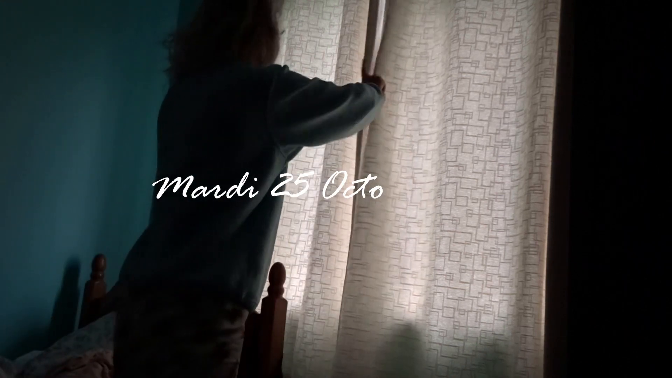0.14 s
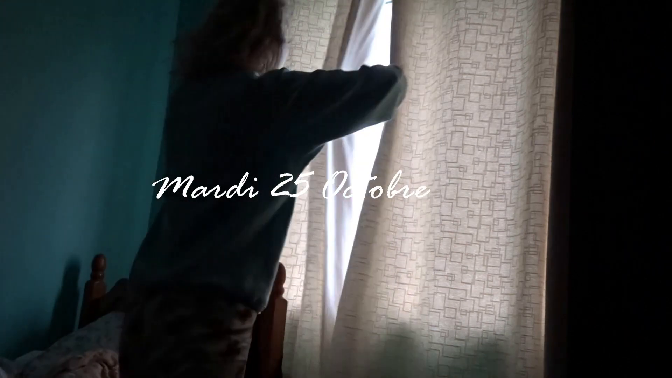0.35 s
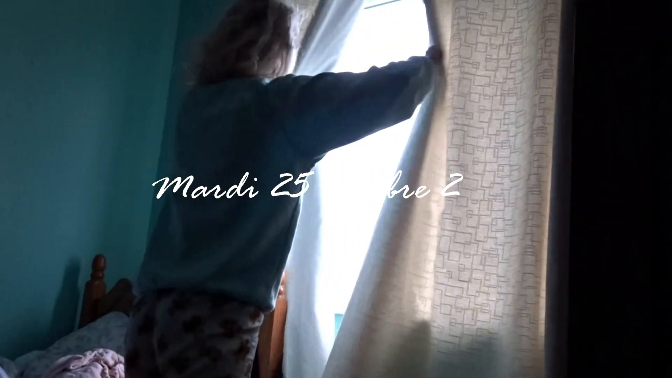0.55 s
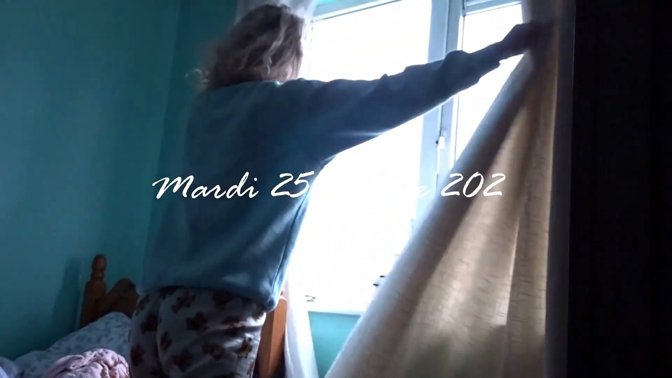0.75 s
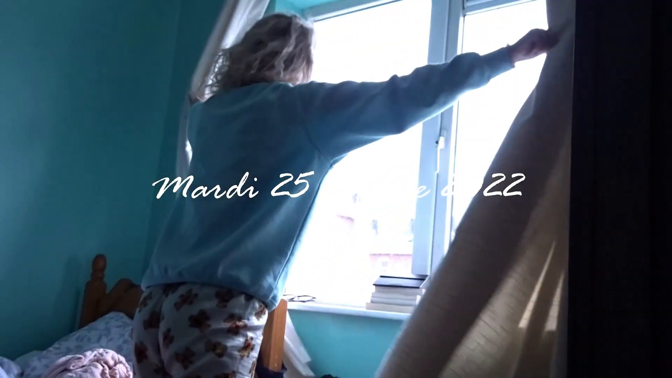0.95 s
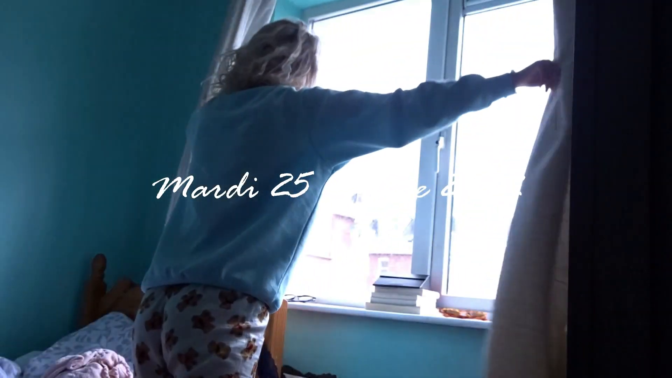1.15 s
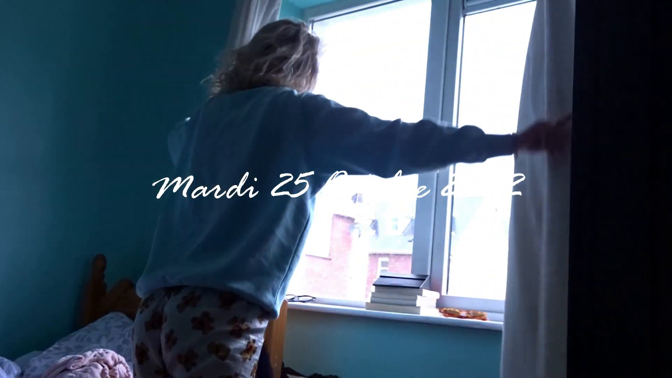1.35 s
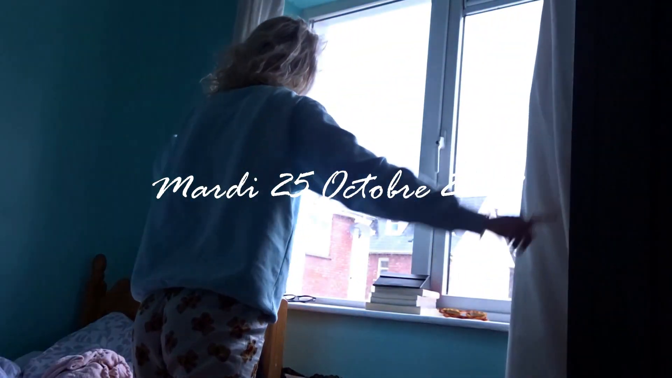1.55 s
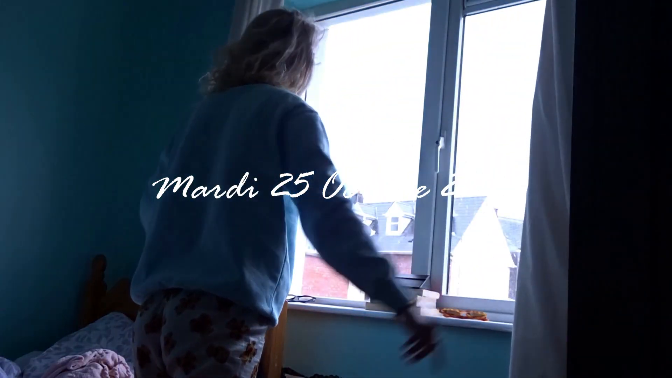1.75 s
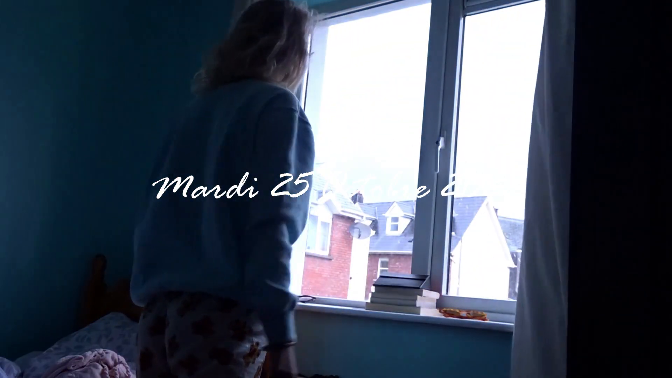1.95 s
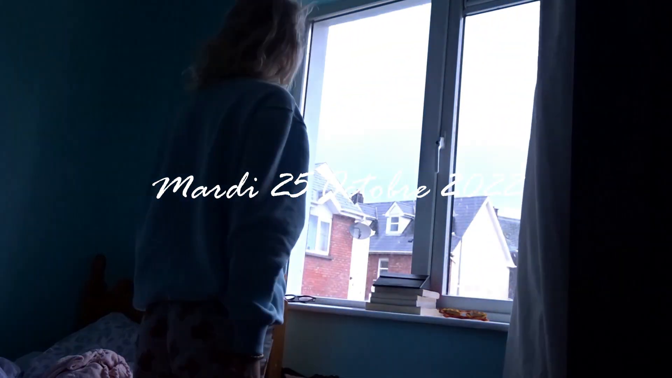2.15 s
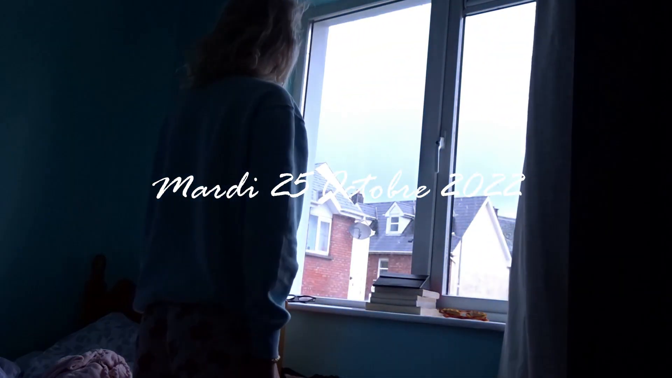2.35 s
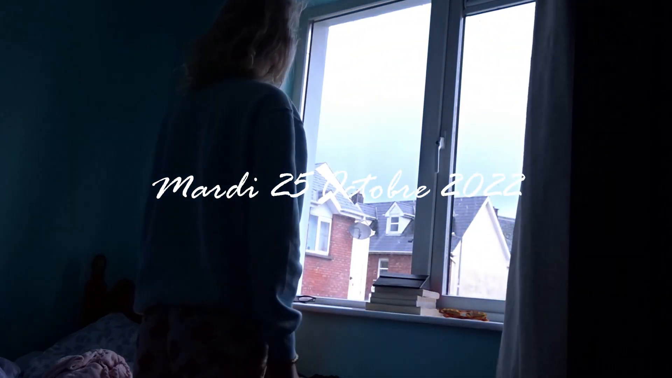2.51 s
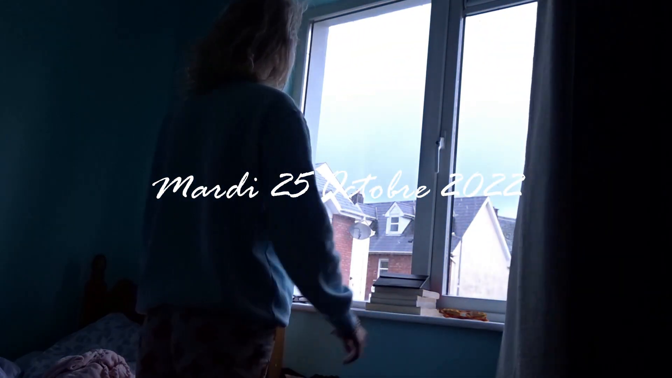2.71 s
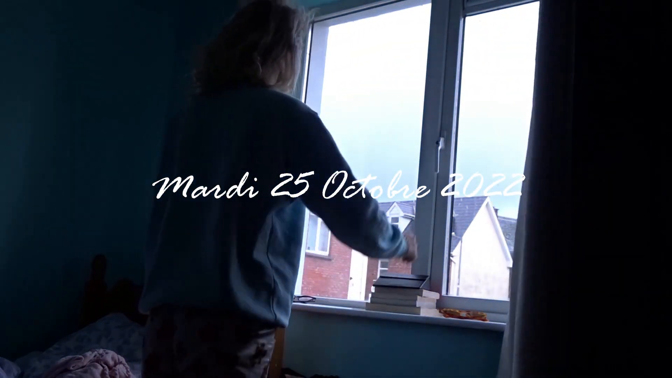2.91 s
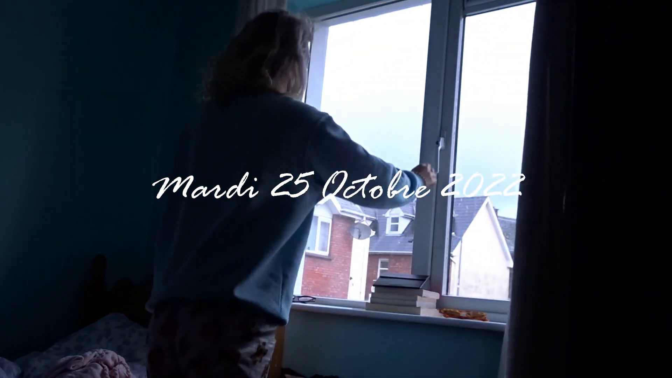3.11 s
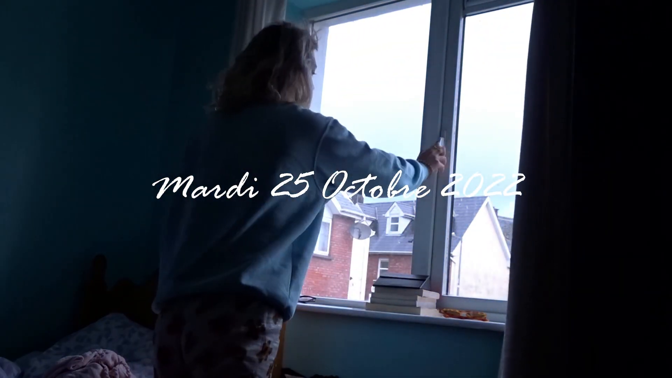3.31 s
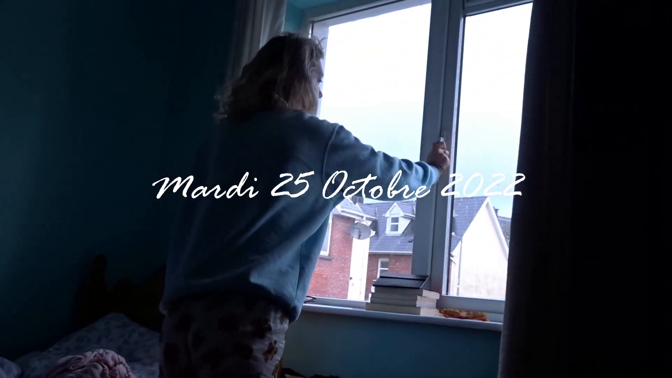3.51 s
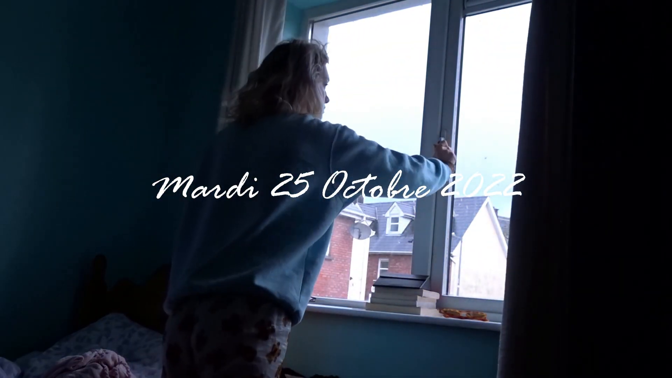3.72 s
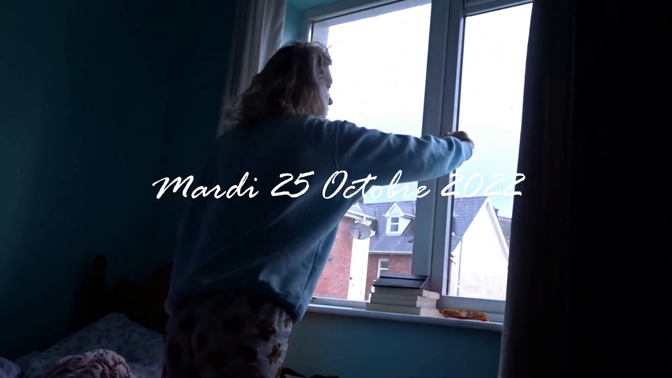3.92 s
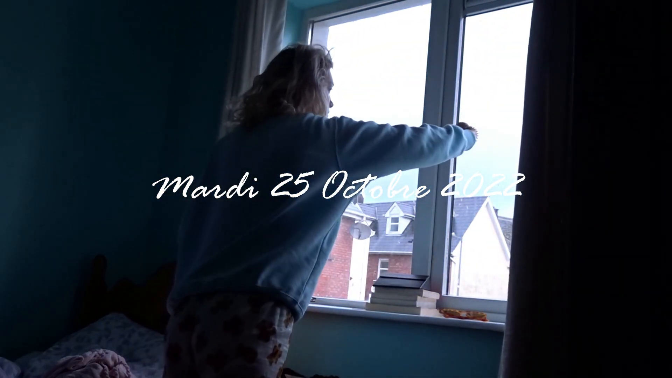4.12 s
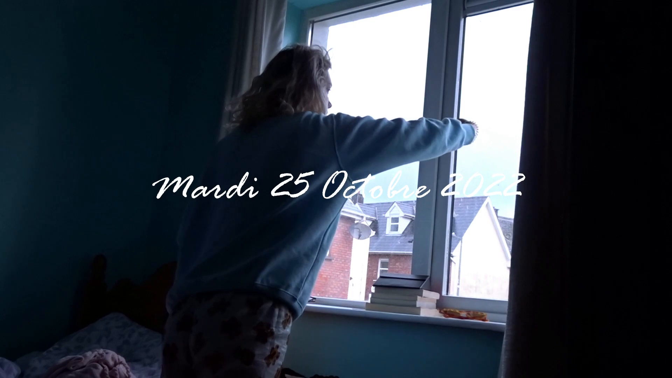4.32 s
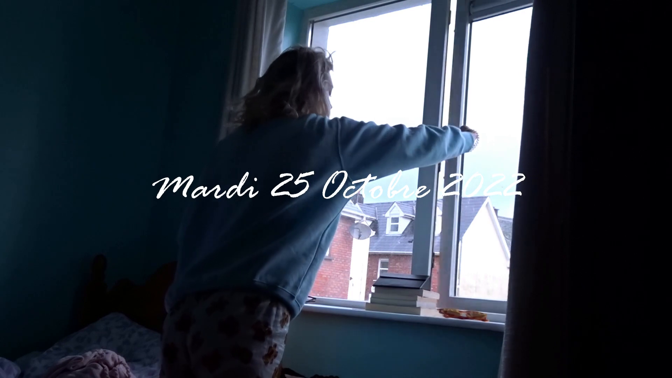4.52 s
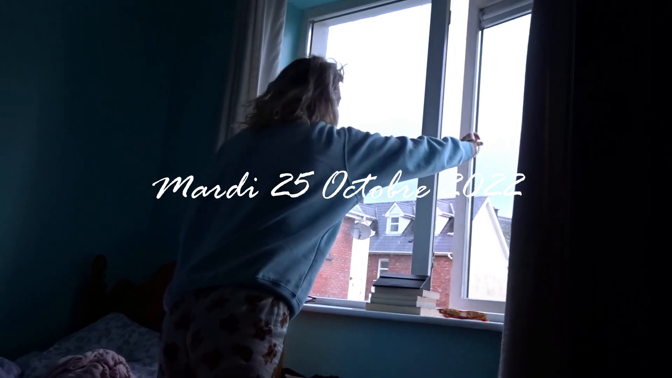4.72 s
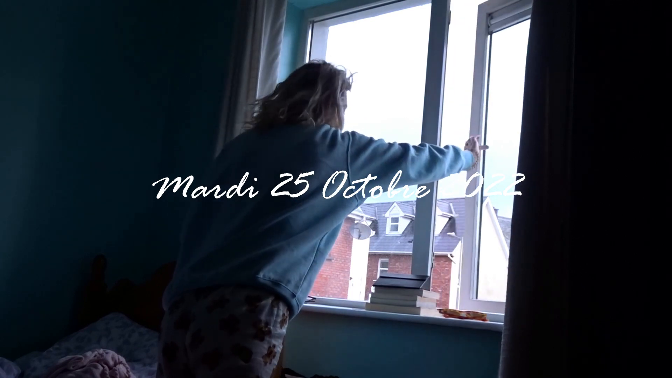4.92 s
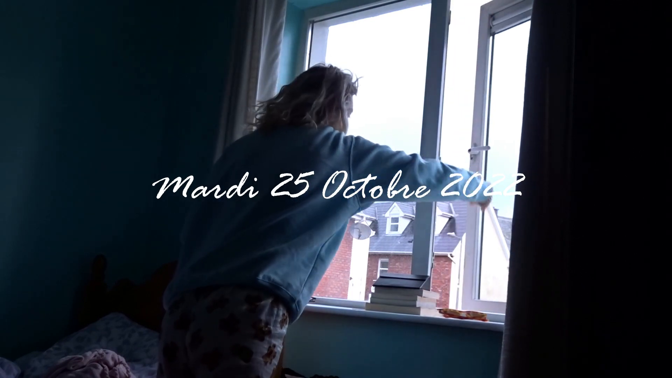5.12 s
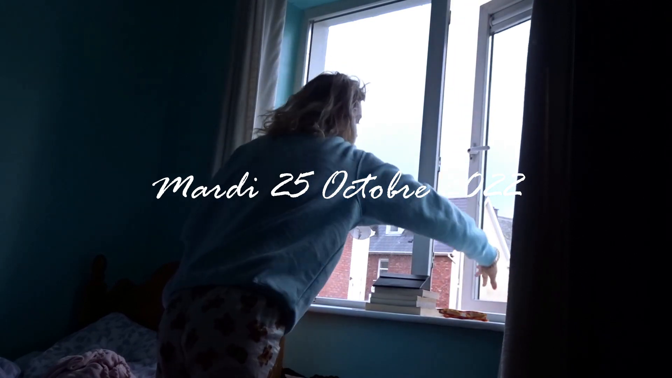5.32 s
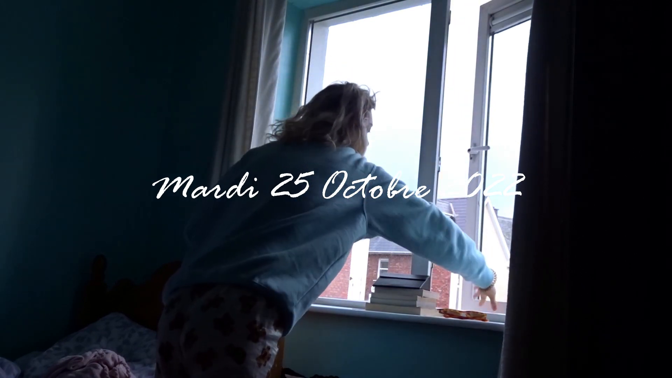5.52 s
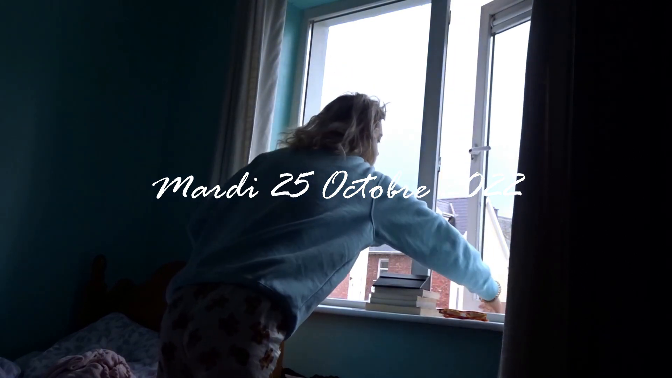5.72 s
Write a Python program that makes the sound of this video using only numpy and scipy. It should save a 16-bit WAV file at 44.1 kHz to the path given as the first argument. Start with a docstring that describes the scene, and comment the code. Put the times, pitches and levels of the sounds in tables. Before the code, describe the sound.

A small, quiet bedroom is heard through a nearby stereo microphone, with faint steady hiss and short echoes. It opens with a soft stir of floor and clothing. At about 0.4 seconds curtains are pulled open: gliders rattle and scrape brightly along a thinly ringing rail, loudest around 0.8 seconds, bunch up at 1 second and settle with small ticks by 1.6. A lull follows, with only faint rustling, shifting weight and a few tiny ticks. From 3.5 to 4 seconds a window handle turns with sharp plastic clicks, metal scraping and a thud through the frame and pane. Between 4.2 and 4.8 seconds the window peels off its rubber seal and swings out with another cluster of knocks and rubbing. A barely audible high hinge squeak comes near 4.9 seconds. Soft sleeve rustle and a faint low hum close the scene around 5.8 seconds.

```python
"""A faint stir of floor and cloth, then curtains are pulled open: gliders rattle along a rail, bunch up
and settle. After a lull a window handle is turned, the sash peels off its rubber seal and swings out,
shaking frame and pane. Each source is a stream of tiny contacts, coloured by the thing they shake.
A stereo microphone stands in the small bedroom, near enough for the direct sound to lead the echoes."""
import sys
import numpy as np
from scipy import signal
from scipy.fft import rfft, irfft, next_fast_len
from scipy.io import wavfile

SR = 44100
rng = np.random.default_rng(int(sys.argv[2]) if len(sys.argv) > 2 else 0)


def transcribe(u):
    """Save the signal u as a 16-bit wav file named by the first command-line argument.

    u: samples, shape (n,) or (channels, n), limited to [-1, 1]; the rate is SR.
    q: integer samples, one column per channel.
    """
    v = np.clip(np.atleast_2d(u).T, -1, 1)
    q = np.round(v * 32767).astype(np.int16)
    wavfile.write(sys.argv[1], SR, q)


N = 258110
TIME = np.arange(N) / SR
PAD = next_fast_len(N + SR // 2)
HZ = np.maximum(np.arange(PAD // 2 + 1) * SR / PAD, 1)


def amp(db):
    """Decibels to gain; table levels are relative, ahead of each layer's own gain."""
    return 10 ** (np.asarray(db) / 20)

def rms_one(x):
    """Scale to unit power."""
    return x / np.sqrt(np.mean(x ** 2) + 1e-20)

def gains(table):
    """Level curves as gains, silent outside their span."""
    times, *columns = np.transpose(table)
    return np.array([amp(np.interp(TIME, times, db, -200, -200)) for db in columns])

def bursts(events, count):
    """Each event cracks, then dies away with a t60 of at most 0.4 s; one gain per level column."""
    out, t = np.zeros((count, N)), np.arange(SR // 2) / SR
    for start, *levels_db, t60 in events:
        at = round(start * SR)
        fall = amp(-60 * t / np.clip(t60, .01, .4)) + 0.25 * np.exp(-t / 0.00084)
        out[:, at:at + len(t)] += amp(levels_db)[:, None] * fall[:N - at]
    return out

def swells(rows, pace=(1,)):
    """Movements rise and fall at steady dB rates times pace; one gain per level column."""
    power = 0
    for peak, *levels_db, rise, fall in rows:
        since = TIME - peak
        slope_db = np.minimum(abs(rise) * since, -abs(fall) * since)
        power += amp(np.c_[levels_db] + np.c_[list(pace)] * slope_db) ** 2
    return np.sqrt(power)

def drift(per_s, count):
    """Slow random wander, one curve per row."""
    knots = rng.standard_normal((count, 200))
    return np.array([np.interp(TIME * per_s, np.arange(len(k)), k) for k in knots])

def shape(points):
    """A spectrum table as gain on the frequency grid."""
    hz, db = np.transpose(points)
    return amp(np.interp(np.log(HZ), np.log(hz), db))

def body(modes):
    """Resonances side by side, signs alternating."""
    return sum((-1) ** k * amp(db) * 1j * HZ * width / (hz ** 2 - HZ ** 2 + 1j * HZ * width)
               for k, (hz, width, db) in enumerate(modes))

def through(excitation, gain, response):
    """The spectrum of an excited body, its response scaled to unit power."""
    return rfft(excitation * gain, PAD) * response / np.sqrt(np.mean(np.abs(response) ** 2))

def resonate(x, hz, width):
    """One mode with steep skirts: two wider resonances in a row."""
    r = np.exp(-np.pi * 1.55 * width / SR)
    mode = [1, 0, -1, 1, -2 * r * np.cos(2 * np.pi * hz / SR), r * r]
    return (1 - r * r) ** 1.5 / 2 * signal.sosfilt([mode, mode], x + 1e-18)

def grains(per_s, spread_db, smooth):
    """Uneven little contacts over even friction, as mid and side streams."""
    sizes = amp(spread_db * np.minimum(rng.exponential(1, (2, N)), 4)) * rng.choice([-1, 1], (2, N))
    clicks = rms_one(sizes * (rng.random((2, N)) < per_s / SR))
    return rms_one(clicks + smooth * rng.standard_normal((2, N)))

def elsewhere(contacts):
    """The same kind of contacts at another spot: unrelated in detail."""
    return np.roll(contacts, rng.integers(N), axis=1)

def strike(contacts, times, db):
    """Add one sharp impact at each time."""
    struck = contacts.copy()
    struck[:, np.round(times * SR).astype(int)] += amp(db)
    return struck

def knocks(contacts, modes, blows, db_per_octave):
    """Each blow strikes once, then chatters; it wakes mostly the modes near its own pitch."""
    starts, db, t60, pitch = np.transpose(blows)
    struck = strike(contacts, starts, db=17.5)
    out = 0
    for hz, width, _ in modes:
        mode_db = db - db_per_octave * np.abs(np.log2(pitch / hz))
        out += resonate(struck * bursts(np.c_[starts, mode_db, t60], count=1)[0], hz, width)
    return rfft(out, PAD)

def steered(contacts, gain, modes, lead_hz, db_per_octave):
    """Rubbing feeds every mode, most those near the leading pitch."""
    out = 0
    for hz, width, db in modes:
        mode_db = db - db_per_octave * np.abs(np.log2(lead_hz / hz))
        out += resonate(elsewhere(contacts) * gain * amp(mode_db), hz, width)
    return rfft(out, PAD)


# The still bedroom, mid and side. Each row: frequency in Hz, noise density in dB.
ROOM_MID = [(12, -47.5), (20, -18), (119, -18.5), (172, -13.5), (268, -13), (397, -13.5), (524, -8.5),
            (655, -21), (1180, -27), (1690, -15.5), (1890, -20), (2240, -20), (3130, -23.5), (9040, -29),
            (15800, -35.5)]
ROOM_SIDE = [(12, -59), (20, -37), (227, -10), (326, -11.5), (408, -7), (570, -5.5), (797, -9),
             (2500, -13.5), (3130, -15), (15800, -27.5)]

def room_tone():
    """Steady room air and microphone hiss, as mid and side spectra."""
    return (through(rng.standard_normal(N), amp(-60.5), shape(ROOM_MID)),
            through(rng.standard_normal(N), amp(-59), shape(ROOM_SIDE)))


# A low hum in the room. Each row: frequency in Hz, width in Hz, level in dB.
HUM_MODES = [(269, 40, 0), (327, 28, 2), (370.3, 30, -2)]
# Its course. Each row: time in seconds, level in dB.
HUM_CURVE = [(0.0, -42), (0.04, -45), (0.164, -59), (0.4, -61), (1.74, -63.5), (1.85, -69), (2.1, -80),
             (2.5, -78), (2.83, -61), (2.95, -76), (3.25, -56), (3.32, -66), (4.85, -60), (5.16, -58),
             (5.5, -54), (5.6, -61), (5.72, -47.5), (5.78, -55.5), (5.85, -58.5)]
# Its tone. Each row: peak time in seconds, level in dB, rise and fall in dB per second.
HUM_SWELLS = [(5.66, -59, 59.5, 36.5), (5.8, -51.5, 120, 31.5)]

def hum(rubbing):
    """A low hum comes and goes; near the end a narrow tone stands out of it."""
    pitch_hz = 255 + 4.73 * drift(per_s=12, count=1)[0]
    tone = np.sqrt(2) * np.sin(2 * np.pi * np.cumsum(pitch_hz) / SR) * swells(HUM_SWELLS)[0]
    return rfft(tone, PAD) + through(elsewhere(rubbing), gains(HUM_CURVE)[0], body(HUM_MODES))


# Someone shifts about, faint at the microphone.
# Each row: peak time in seconds, floor and cloth levels in dB, rise and fall in dB per second.
SHIFTS = [(0.0, -51.5, -51.5, 98, 63.5), (0.42, -79, -51.5, 205.5, 306), (1.99, -64.5, -68, 147, 43),
          (2.08, -68.5, -65.5, 40.5, 200), (2.83, -72, -63, 59, 45), (3.28, -54, -58.5, 76, 26),
          (4.85, -72.5, -57.5, 200, 23.5), (5.58, -70, -59.5, 75, 100), (5.74, -61.5, -60, 94.5, 31.5)]
# Boards underfoot. Each row: frequency in Hz, width in Hz, level in dB.
BOARD_MODES = [(124, 38.5, 8), (75.4, 50, -15), (199, 120, -3)]
# Sleeves. Each row: frequency in Hz, density in dB.
CLOTH_SPECTRUM = [(100, -46), (300, -4.5), (600, 7.5), (1000, 6.5), (2000, -7.5), (4000, -7.5),
                  (9000, -16.5), (15000, -19.5)]

def stir(rubbing):
    """Weight shifts on the boards and sleeves rustle, never quite still."""
    restless = amp(np.c_[[-80.5, -68]] + 4.5 * drift(per_s=3.6, count=2))
    weight, rustle = np.hypot(swells(SHIFTS), restless)
    return through(rubbing, weight, body(BOARD_MODES)) + through(rubbing, rustle, shape(CLOTH_SPECTRUM))


# At the window, strokes of handle and sash. Each row: peak time in seconds, levels of frame thud,
# plastic rub, metal scrape and pane in dB, base rise and fall in dB per second.
STROKES = [(3.566, -35, -29, -25, -37, 604, 198), (3.62, -37.5, -46, -42, -40, 251, 202),
           (3.678, -20.5, -30, -62, -27.5, 704, 252), (3.81, -38, -48, -47.5, -59.5, 500, 118),
           (3.85, -44, -34, -33.5, -43, 222, 260), (3.926, -47, -44.5, -44.5, -50, 404, 76),
           (4.05, -52, -71, -71, -59, 200, 146), (4.37, -30, -26.5, -31.5, -38, 226, 260),
           (4.385, -27.5, -30, -56, -37, 300.5, 300), (4.428, -37.5, -33.5, -42.5, -34.5, 400, 206),
           (4.56, -43.5, -38, -48, -48.5, 175, 98), (4.66, -43, -42, -69, -42.5, 252, 249.5),
           (4.675, -54, -57, -67, -39, 400, 350), (4.76, -56.5, -59, -61.5, -59.5, 42, 40)]
# Faint ticks of someone moving about, then knocks of handle and latch. Each row: start in seconds,
# levels of scrape, seal, thud and knock in dB, t60 in seconds, knock pitch in Hz.
TICKS_AND_KNOCKS = [(2.049, -50.5, -62, -70, -48.5, 0.1, 1650), (2.826, -64.5, -81, -53, -44, 0.1, 793),
                    (3.1635, -57, -66.5, -66, -43.5, 0.17, 773), (3.2185, -48.5, -61, -46, -60, 0.23, 556),
                    (3.268, -48, -67, -59, -53, 0.26, 758), (3.468, -46, -50.5, -41, -51, 0.2, 810),
                    (3.5226, -23, -48, -27.5, -33, 0.11, 745), (3.5538, -15.5, -21, -25, -27, 0.096, 1240),
                    (3.669, -49, -55, -32, -20, 0.25, 830), (3.7057, -45, -57, -44, -39, 0.072, 910),
                    (3.8023, -30, -64, -29, -28.5, 0.18, 1170), (3.8437, -20, -37, -26.5, -46, 0.067, 1070),
                    (3.916, -30, -56, -30.5, -28.5, 0.25, 970), (4.2225, -47.5, -62, -48, -38, 0.26, 810),
                    (4.3047, -42, -52, -49, -30.5, 0.16, 1070), (4.3264, -27.5, -46, -51, -34, 0.1, 837),
                    (4.3547, -42, -57, -36, -20.5, 0.2, 920), (4.4287, -50, -34, -45, -25.5, 0.1, 1420),
                    (4.554, -37, -67, -48, -41, 0.11, 910), (4.6, -59, -70, -26, -29.5, 0.029, 860),
                    (4.6424, -40.5, -74, -30, -35, 0.18, 1140), (4.793, -47, -55.5, -62, -42.5, 0.23, 604)]
# A faint hinge squeak. Each row: peak time in seconds, level in dB, rise and fall in dB per second.
HINGE_SWELL = [(4.94, -62.5, 180, 233)]
# The parts that resonate. Each row: frequency in Hz, width in Hz, level in dB.
FRAME_MODES = [(123.5, 5.8, 2), (188.6, 53, -1.5), (217, 155, -1.5), (342, 280, -9)]
PLASTIC_MODES = [(540, 300, -7.5), (836, 170, 0), (1057, 390, -1), (1244, 257, -6), (1640, 550, -5.5)]
PANE_MODES = [(24.9, 6, 5), (56, 5.5, 6), (72.5, 32, -2)]
HINGE_MODES = [(12460, 690, 0)]
# Metal scraping and rubber unsticking. Each row: frequency in Hz, density in dB.
METAL_SPECTRUM = [(900, -28), (1700, 4.5), (2200, 1), (3000, 8), (4400, 4), (5300, 0), (7200, -2),
                  (8500, -16.5), (12000, -45)]
SEAL_SPECTRUM = [(3000, -50), (5000, -48), (8000, 11), (9500, 7), (12000, 9), (14000, 5.5), (15800, 1)]

def window():
    """Handle and latch shake the frame, rub plastic and scrape metal; the pane pumps the room air."""
    starts, scrape_db, seal_db, thud_db, knock_db, t60, pitch = np.transpose(TICKS_AND_KNOCKS)
    thud, rub, scrape, pump = swells(STROKES, pace=(1.06, 0.97, 1.016, 0.83))
    peel = amp(-35) * (scrape / amp(-24.5)) ** 1.04   # the seal peels most on hard strokes
    hits = bursts(np.c_[starts, scrape_db, seal_db, thud_db, t60], count=3)
    hit_scrape, hit_peel, hit_thud = hits * amp([[-9], [-6], [-6]])
    contacts = grains(per_s=3000, spread_db=6.5, smooth=0.97)
    shaken = strike(contacts * np.hypot(thud, hit_thud), starts, thud_db + 20.5)
    frame = through(shaken, 0.92, body(FRAME_MODES))
    rubbed = sum(amp(db) * resonate(elsewhere(contacts) * rub, hz, width)
                 for hz, width, db in PLASTIC_MODES)
    events = np.c_[starts, knock_db, t60, pitch]
    knocked = knocks(elsewhere(contacts), PLASTIC_MODES, events, db_per_octave=15.5)
    metal = through(contacts, np.hypot(scrape, hit_scrape), shape(METAL_SPECTRUM))
    seal = through(elsewhere(contacts), np.hypot(peel, hit_peel), shape(SEAL_SPECTRUM))
    pane = through(elsewhere(contacts), pump, body(PANE_MODES))
    hinge = through(contacts, swells(HINGE_SWELL)[0], body(HINGE_MODES) ** 2)
    return frame + amp(-4) * rfft(rubbed, PAD) + amp(-9) * knocked + metal + seal + pane + hinge


# At the curtain rail, loudest at the microphone: the speed of the pull, heard as level.
# Each row: time in seconds, rattle and scrape levels in dB.
PULL_CURVE = [(0.36, -63, -63), (0.432, -41.5, -65), (0.5, -39.5, -51), (0.514, -33, -60),
              (0.594, -26.5, -36), (0.67, -20.5, -23), (0.69, -17.5, -27.5), (0.818, -12.5, -16.5),
              (0.912, -19, -23.5), (0.965, -27.5, -43), (1.048, -50, -58), (1.15, -45, -60),
              (1.3, -56, -66), (1.5, -55, -82), (1.6, -89, -89)]
# Gliders catch and bunch. Each row: start in seconds, levels of rattle, scrape and knock in dB,
# t60 in seconds, knock pitch in Hz.
GLIDER_JOLTS = [(0.421, -44.5, -51, -32, 0.46, 554), (0.5097, -16.5, -25.5, -44, 0.37, 1090),
                (0.534, -32.5, -50.5, -37.5, 0.3, 595), (0.5865, -15, -32.5, -26.5, 0.61, 600),
                (0.6055, -16, -30, -29, 0.03, 1080), (0.6238, -16, -28.5, -30.5, 0.023, 1140),
                (0.6749, -3.5, -8, -26, 0.14, 1256), (0.6884, -5, -16.5, -19, 0.084, 1120),
                (0.7187, 0.5, -12, -14, 0.14, 598), (0.8082, -4, -13.5, -15.5, 0.064, 1242),
                (0.8285, -20, -16, -12, 0.088, 1050), (0.8846, 3, -17.5, -12, 0.041, 608),
                (0.9012, -11.5, -22, -18, 0.19, 554), (0.9728, -41, -40.5, -20, 0.06, 1010),
                (1.0738, -35, -67, -33, 0.47, 1100), (1.189, -46, -66, -39.5, 0.42, 1130),
                (1.3134, -48, -63, -42, 0.26, 589), (1.4035, -40.5, -77, -34.5, 0.29, 757),
                (1.6215, -58, -74, -46, 0.32, 1016)]
# They pile up at the rail's end, then the folds swing out.
# Each row: peak time in seconds, knock level in dB, rise and fall in dB per second.
PILE_UP_SWELLS = [(0.975, -21.5, 900.5, 237), (1.09, -47.5, 91, 35)]
# The pitch leading the rattle. Each row: time in seconds, pitch in Hz.
RATTLE_PITCH = [(.42, 2280), (.52, 2680), (.69, 2810), (.73, 2520), (.82, 3100), (.9, 2700), (1.04, 2900),
                (1.1, 2150), (1.16, 3100), (1.22, 2150), (1.3, 3000), (1.42, 2050)]
# Gliders, rail and its thin ringing metal. Each row: frequency in Hz, width in Hz, level in dB.
GLIDER_MODES = [(1620, 251, 3.5), (1670, 110, -5.5), (1965, 230, -0.5), (2190, 100, -7), (2343, 780, 2.5),
                (2572, 300, 1), (2812, 88, -5.5), (2940, 75, -1.5), (3240, 580, 2), (3814, 245, -4.5)]
RAIL_MODES = [(504, 79, -1), (609, 70, -2), (806, 150, -3), (908, 58, -4), (1071, 205, 1),
              (1460, 210, -5.5), (350, 92, 0.5), (122.6, 79, -10.5)]
RING_MODES = [(8055, 3.8, 10), (3720, 8, 9), (2940, 15.3, -1.5), (5650, 34, -0.5), (7350, 120, -7.5),
              (4500, 30, -4.5)]
# The bright scrape of sliding. Each row: frequency in Hz, density in dB.
SCRAPE_SPECTRUM = [(1200, -46), (2500, -6), (3500, -13), (4300, -4.5), (5000, -4), (5700, -5), (6500, -5.5),
                   (7500, -4), (9400, -8), (11600, -6), (15000, -14), (15800, -9.5)]

def curtain():
    """Sliding gliders rattle and scrape; the rail knocks along, and each jolt sets its metal ringing."""
    starts, rattle_db, scrape_db, knock_db, t60, pitch = np.transpose(GLIDER_JOLTS)
    rattle, scrape = gains(PULL_CURVE)
    knock = np.hypot(amp(-24) * (rattle / amp(-16)) ** 0.93, swells(PILE_UP_SWELLS)[0])
    hits = bursts(np.c_[starts, rattle_db, scrape_db, knock_db, t60], count=3)
    rattle, scrape, knock = np.hypot([rattle, scrape, knock], hits * amp([[-8], [-6], [-3.5]]))
    contacts = grains(per_s=3000, spread_db=4.5, smooth=0.65)
    glider_hz = np.interp(TIME, *np.transpose(RATTLE_PITCH))
    rail_hz = np.interp(TIME, starts, pitch)   # glides from jolt to jolt
    upper_modes, low_modes = RAIL_MODES[:-2], RAIL_MODES[-2:]
    gliders = amp(-10.5) * steered(contacts, rattle, GLIDER_MODES, glider_hz, db_per_octave=18)
    sliding = through(contacts, scrape, shape(SCRAPE_SPECTRUM))
    rail = amp(-9.5) * steered(contacts, knock, upper_modes, rail_hz, db_per_octave=7)
    rail += amp(-14) * through(elsewhere(contacts), knock, body(low_modes))
    blows = np.c_[starts, knock_db, t60, pitch]
    jolts = amp(-9) * knocks(elsewhere(contacts), upper_modes, blows, db_per_octave=34.5)
    struck_metal = strike(elsewhere(contacts) * scrape, starts, scrape_db + 29)
    return gliders + sliding + rail + jolts + rfft(struck_metal, PAD) * body(RING_MODES)


def echoes(t60):
    """Dense reflections off the near walls, as a response of unit energy."""
    tail = rng.standard_normal((2, SR // 2)) * amp(-60 * np.arange(SR // 2) / SR / t60)
    return rfft(rms_one(tail) / np.sqrt(SR // 2), PAD)


# Width at the microphone, greatest in the treble. Each row: frequency in Hz, side over mid in dB.
STEREO_WIDTH = [(30, -27), (150, -28), (290, -17.5), (640, -13.5), (1400, -8), (3100, -5), (6800, -0.5),
                (15000, -1)]

def scene():
    """The sources and their short echoes over the room tone, turned from mid and side to left and right."""
    sources = curtain() + window()
    rubbing = grains(per_s=1100, spread_db=2.5, smooth=1)
    sources += stir(rubbing) + hum(rubbing)
    mid, side = sources * (1 + amp(-7) * echoes(t60=0.22))
    room_mid, room_side = room_tone()
    mid += room_mid
    side = side * shape(STEREO_WIDTH) + room_side
    return irfft(np.array([mid + side, mid - side]), PAD)[:, :N]

def record(dry):
    """The highest peaks are rounded and the top is cut at 15.8 kHz."""
    rounded = dry / (1 + (dry / .9) ** 6) ** (1 / 6)
    return signal.sosfilt(signal.ellip(14, .5, 75, 15800, fs=SR, output="sos"), rounded)


dry = scene()
out = record(dry)
transcribe(out)
```